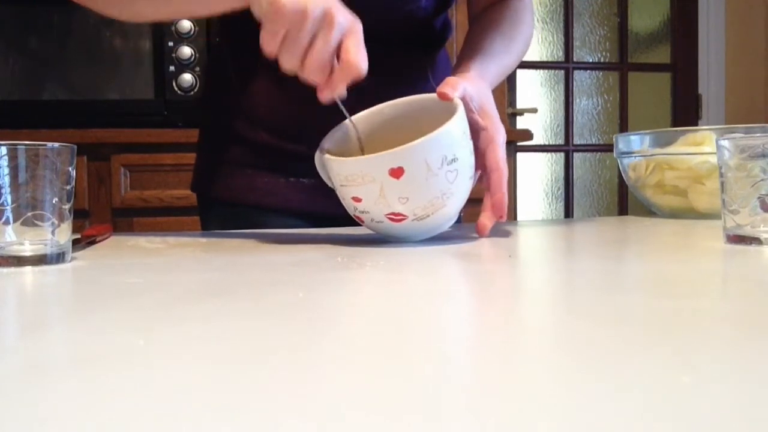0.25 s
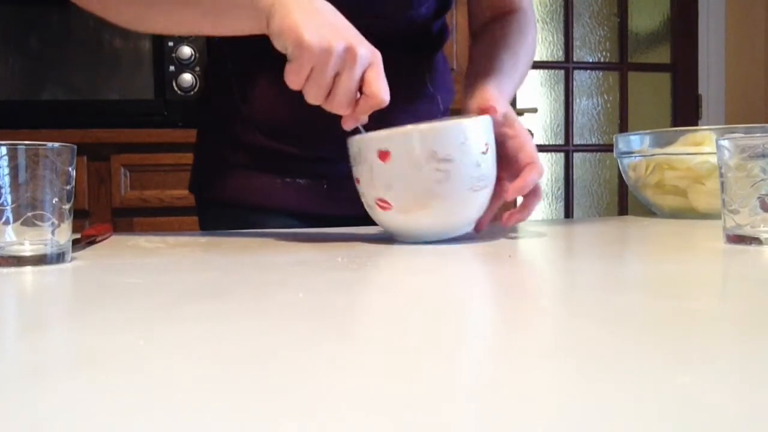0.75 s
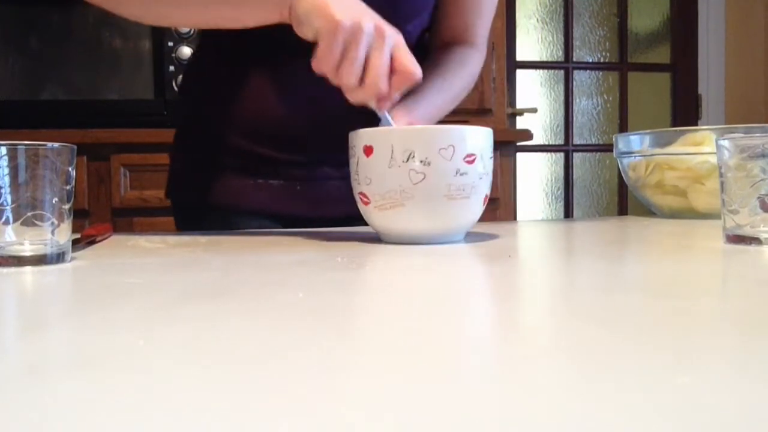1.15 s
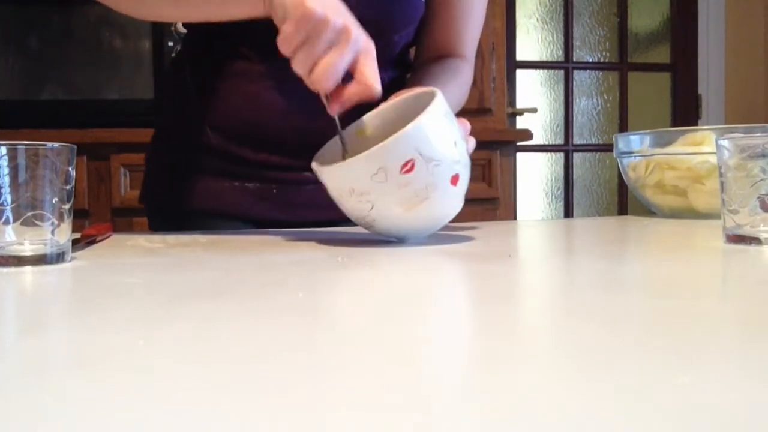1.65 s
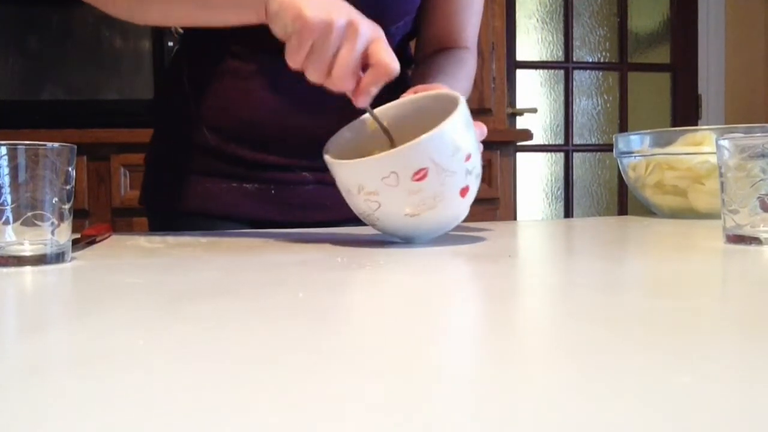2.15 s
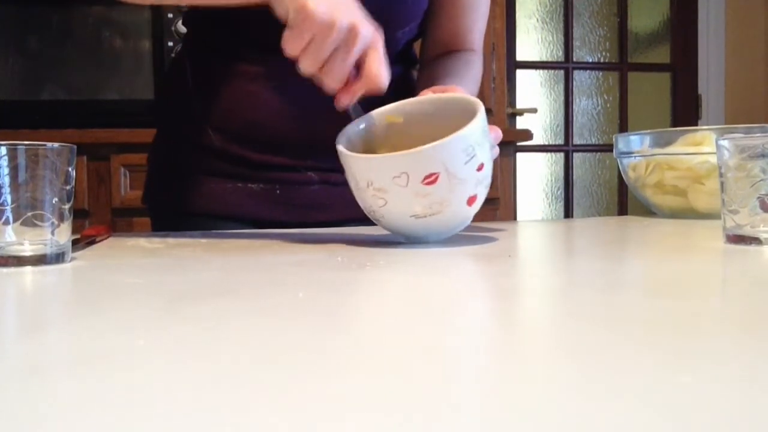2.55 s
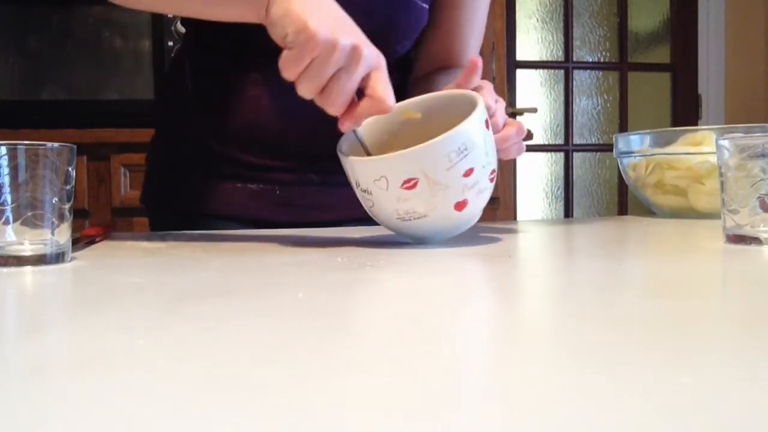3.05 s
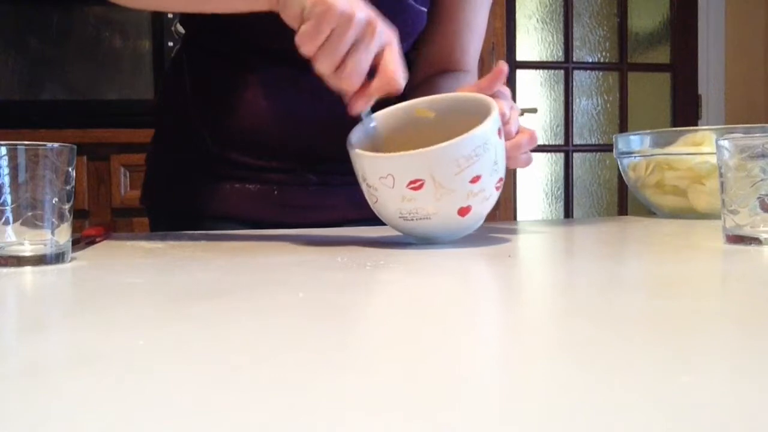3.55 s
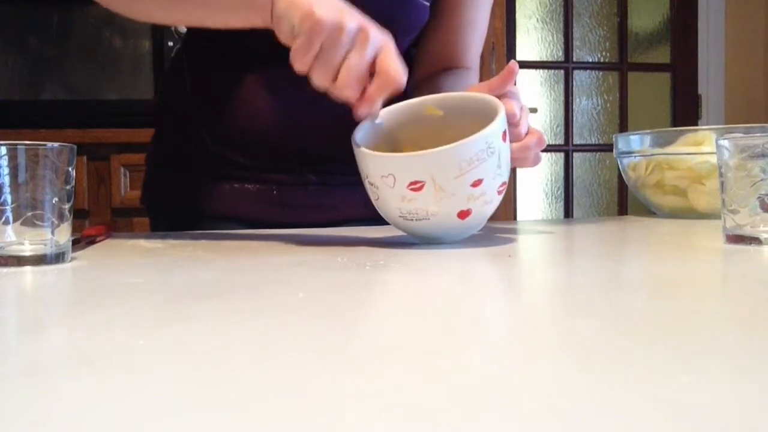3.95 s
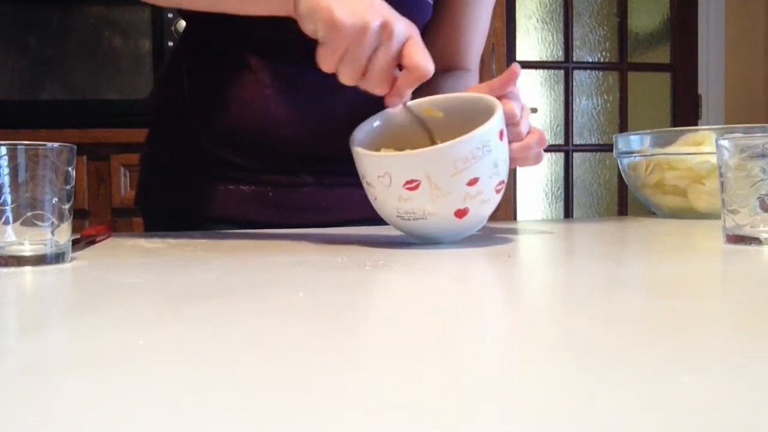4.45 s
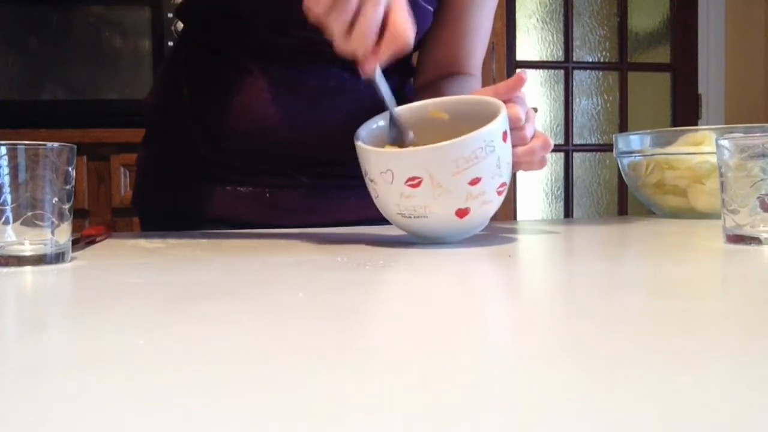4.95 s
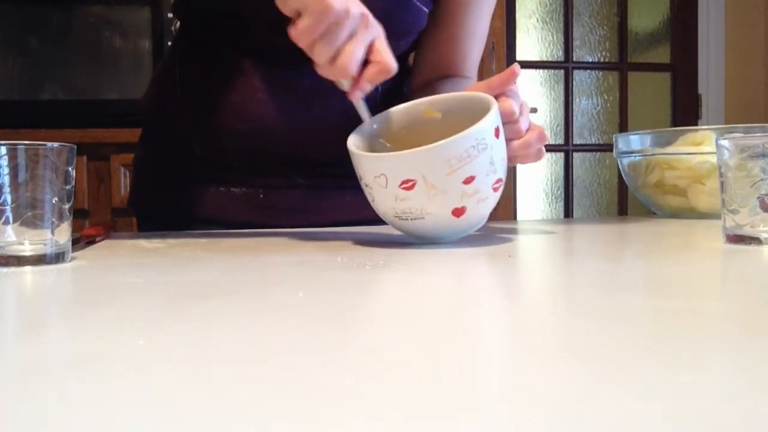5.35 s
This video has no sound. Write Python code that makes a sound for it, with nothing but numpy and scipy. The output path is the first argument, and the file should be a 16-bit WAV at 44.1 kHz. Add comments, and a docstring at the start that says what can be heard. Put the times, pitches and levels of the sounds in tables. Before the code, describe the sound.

A metal fork mashes cooked fruit in a big ceramic bowl. It clinks sharply against the side, then the bowl drops flat on the counter with a knock and a low thud. Soft wet squelches, dull fork ticks and light scrapes follow unevenly, with another clink midway and a bright one near the end, trailed by a short scrape. The sounds are close, in a small hard kitchen with a faint hiss.

```python
"""A kitchen counter in a small hard room: a fork mashes cooked apple in a big handled ceramic bowl.
Impacts excite normal modes: the bowl clinks when bare glaze is struck, the fork ticks dully through
the fruit, and stick-slip friction makes the wall sing. The pulp crackles, squelches through small
resonant cavities and pops as air pockets burst. The bowl is set down once and its foot rubs, driving
the low modes of the counter. The room reverberates over a faint hiss."""
import sys
import numpy as np
from scipy import signal
from scipy.io import wavfile
from scipy.ndimage import uniform_filter1d

SR = 44100
rng = np.random.default_rng(int(sys.argv[2]) if len(sys.argv) > 2 else 0)


def wav_out(sig):
    """Save sig, one row per channel (or a flat mono array), as 16-bit PCM at SR to the path in sys.argv[1]."""
    wavfile.write(sys.argv[1], SR, np.round(np.clip(np.atleast_2d(sig).T, -1, 1) * 32767).astype(np.int16))


N = 247158

# Levels in all tables are relative; t60 is the time a vibration takes to fall by 60 dB.
# Fork on bare glaze. Each row: start in seconds, counter thump in dB, the low, middle, high and
# sparkle registers in dB, ring length factor, extra crack in dB.
GLAZE_CLINKS = [(0.375, -42, -24, -15.5, -21.5, -25.5, 0.52, 0.83),
                (0.3898, -42.5, -34.5, -21.5, -24.5, -36, 0.52, 5.5),
                (3.3984, -50, -20.5, -25.5, -26.5, -34.5, 0.33, 5.1),
                (3.4451, -47, -63, -48, -39.5, -48, 0.12, 9.3),
                (4.0996, -59, -39.5, -38, -41.5, -41.5, 0.26, 2.1),
                (5.1868, -31.5, -22, -21.5, -16.5, -20.5, 0.71, 12.7)]
# The edge of the foot meets the counter. Each row: as for the clinks.
FOOT_STRIKES = [(0.85, -28, -18, -22.5, -20, -26.5, 0.4, 3)]
# The four registers of an impact. Each entry: lower edge in Hz.
REGISTER_EDGES = [1400, 2200, 5200, 9700]
# Tines strike through fruit. Each row: start in seconds, level in dB, tilt in dB per octave, thump in dB.
TINE_TICKS = [(0.099, -47.5, -2, -51.5), (0.624, -49.5, 0, -84), (1.8816, -39.5, 2.5, -50.5),
              (2.2519, -38, 1.5, -48), (2.2972, -44.5, -1.5, -44.5), (2.357, -49, -8, -53),
              (2.9998, -48, 1.5, -77.5), (3.0534, -36.5, -0.5, -35), (3.8069, -44, 1, -41.5),
              (4.21, -44, 4.5, -49.5), (4.5041, -37.5, 0, -44.5), (4.695, -54, 7.5, -44),
              (4.813, -32, 0, -36), (5.4453, -38, -2, -45.5)]
# Spectral shape shared by all ticks. Each row: register centre in Hz, level in dB.
TICK_SHAPE = [(1700, -10.5), (3400, -2), (7000, -0.5), (12000, -0.5)]
# Bowl modes, split in pairs by the handle. Each row: frequency in Hz, nominal t60 in seconds,
# level in dB when struck on the wall, level in dB when struck on the foot.
BOWL_MODES = [(1658, 0.53, -12, -3.5), (1764, 0.35, 5, -15), (1950, 0.055, -8, 0.5),
              (2646, 0.067, 0, -14.5), (2920, 0.053, -34.5, 1.5), (3432, 0.12, -8, -20.5),
              (4370, 0.067, 8.5, -34), (4425, 0.13, 6.5, -12.5), (4562, 0.042, 14.5, -16.5),
              (5700, 0.013, -23.5, -17.5), (5060, 0.0088, -16.5, -0.5), (6680, 0.51, 4, 5),
              (6760, 0.13, 17.5, -7.5), (7500, 0.1, -13.5, -16.5), (7480, 0.12, 22, -10),
              (7940, 0.059, 2, -13.5), (8810, 0.1, 9, 6.5), (7940, 0.039, -23.5, -1), (10940, 0.03, 6.5, 5),
              (10850, 0.066, 12, -25.5), (12660, 0.27, 4, -9), (12400, .07, 5.5, -16),
              (15700, 0.089, -7.5, -12)]
# Fork modes, damped by fruit and fingers. Each row: frequency in Hz, nominal t60 in seconds, level in dB.
FORK_MODES = [(1756, 0.18, -14), (2410, 0.0055, 4), (4554, 0.032, -11.5), (5530, 0.0074, -0.5),
              (6010, 0.025, 3.5), (6420, 0.0061, 17.5), (8540, 0.012, -6), (11500, 0.0087, 12),
              (12120, 0.03, 0.5), (12500, 0.0029, 8.5), (14500, .003, 13)]
# Tines drag up the wall. Each row: peak time, rise and fall in seconds, low and middle ring in dB.
WALL_SCRAPES = [(0.005, .02, 0.038, -59.5, -66), (1.63, 0.04, 0.082, -59, -81),
                (2.05, 0.049, 0.045, -57, -74), (2.38, 0.028, 0.042, -60, -57),
                (2.82, 0.14, 0.067, -68, -76), (4.135, 0.031, 0.064, -75, -48),
                (5.29, 0.024, 0.029, -63, -40.5), (5.424, 0.076, .016, -36.5, -39),
                (5.449, 0.033, 0.013, -48, -40.5)]
# Bowl resonances driven by a scrape. Each row: frequency in Hz, width in Hz before broadening.
SCRAPE_RINGS = [(1785, 92), (4450, 170)]
# The hand bears down. Each row: time of greatest force in seconds, then squashed pulp,
# wet crackle and rocking foot in dB.
HAND_STROKES = [(0.0, -55.5, -46, -54), (0.17, -67, -56.5, -59), (0.571, -60.5, -68.5, -57.5),
                (1.469, -53.5, -60.5, -45.5), (1.96, -57.5, -53.5, -49.5), (2.33, -55.5, -51.5, -52),
                (2.551, -57, -62, -58), (2.828, -70.5, -73.5, -54), (3.11, -87, -77.5, -65),
                (3.489, -61, -62.5, -50), (3.849, -70.5, -61, -57.5), (4.261, -65, -52, -49),
                (4.57, -66, -48.5, -67), (4.83, -60.5, -58, -66.5), (5.54, -67, -53, -71)]
# Pulp squeezed between tines. Each row: peak time, rise and fall in seconds, gurgle in dB,
# frequency of the larger cavity in Hz, spray in dB.
PULP_SQUELCHES = [(1.46, 0.058, 0.047, -48.5, 1540, -55), (1.773, 0.0063, 0.05, -53.5, 950, -42),
                  (2.292, 0.016, 0.013, -44.5, 2450, -49), (2.615, 0.035, .031, -61, 1640, -49),
                  (3.68, 0.18, 0.3, -62, 1140, -64.5), (4.329, 0.039, 0.026, -44.5, 2350, -53.5),
                  (4.326, 0.02, 0.069, -51, 590, -49), (4.708, .012, 0.038, -49, 2050, -46.5),
                  (4.74, 0.034, 0.032, -56.5, 794, -59)]
# The largest air pockets burst. Each row: start in seconds, level in dB, pitch in Hz.
LARGE_POPS = [(0.224, -56.5, 4320), (0.747, -56, 3220), (0.752, -51.5, 2350), (1.496, -55.5, 11700),
              (2.109, -60.5, 6140), (2.199, -54.5, 2020), (2.214, -59.5, 9500), (2.337, -48.5, 8840),
              (2.474, -56, 4650), (2.504, -58, 9400), (4.543, -54, 845), (4.729, -56, 834)]
# The bowl drops flat and rocks. Each row: start in seconds, level in dB.
BOWL_THUDS = [(0.845, -39.5), (0.895, -19.5), (0.899, -18), (0.911, -27), (0.932, -32.5), (1.456, -42.5),
              (1.497, -48.5), (1.528, -50.5)]
# The other hand slides or tips the bowl. Each row: peak time, rise and fall in seconds, level in dB.
BOWL_SLIDES = [(0.851, 0.071, 0.075, -32.5), (1.44, 0.044, 0.032, -55), (1.59, 0.032, 0.051, -53),
               (4.725, 0.018, 0.022, -42)]
# Modes of counter top and cupboard. Each row: frequency in Hz, t60 in seconds,
# level in dB under a light tap, level in dB under the whole bowl.
COUNTER_MODES = [(138.3, 0.37, -5.5, -5), (206, 0.47, 3, -8.5), (272, 0.36, 1, 1.5), (329, 0.37, -18, 3.5),
                 (400, 0.46, -13.5, -10), (464, 0.28, -7.5, -1.5), (654, 0.24, -26, -2),
                 (857.6, 0.37, -10.5, -4), (1045, 0.079, -2.5, 2.5)]
# Reverberation of the room. Each row: frequency in Hz, t60 in seconds.
ROOM_DECAY = [(120, 0.11), (500, 0.49), (2000, 0.31), (5000, 0.39), (9000, 0.32), (15000, 0.29)]
# Spectra of the noisy sounds. Each row: frequency in Hz, gain in dB.
CRACK_SPECTRUM = [(1000, -11.5), (2000, -10.5), (2800, -11.5), (3800, -17.5), (5500, -6), (8000, 2.5),
                  (12000, -14), (15500, -3.5)]  # hard surfaces meeting
PULP_SPECTRUM = [(400, -37), (1000, -3), (1700, -1.5), (2700, 3), (4000, -10.5), (6000, -4.5), (15000, -47)]  # fruit squashing
CRACKLE_SPECTRUM = [(1500, -29.5), (4000, -13), (6200, -0.5), (9000, -12), (12000, -8.5), (15500, -7)]  # wet skin parting
SPRAY_SPECTRUM = [(700, -36.5), (1600, -6), (4000, 0), (7000, -4.5), (11000, -5), (15000, -6.5)]  # juice escaping
TAP_SPECTRUM = [(30, -33), (90, -12.5), (140, -2), (220, 7.5), (400, -2.5), (800, -9), (1400, -19),
                (3000, -38)]  # counter under a light tap
THUD_SPECTRUM = [(30, -40.5), (60, -41), (95, -32.5), (135, -4), (230, 9.5), (330, -3), (480, -2),
                 (750, -5), (1100, -4), (1700, -10), (2700, -15.5), (5000, -28), (12000, -45)]  # counter under the whole bowl
RUB_SPECTRUM = [(40, -42.5), (95, -23.5), (140, 1), (210, -0.5), (400, -6), (900, -10), (1500, -35.5),
                (4000, -37.5)]  # foot grinding
HISS_SPECTRUM = [(30, -35.5), (75, -38), (130, -10.5), (270, 5), (670, -10.5), (1500, -10), (4000, -13),
                 (8000, -14), (14300, -15), (15500, -31)]  # the quiet room

TOP_HZ = 15400
EVENT_T = np.arange(SR // 2) / SR  # time axis of one short event, in seconds


def clinks():
    """Impact on bare glaze excites the normal modes of the bowl's wall."""
    hz, t60, wall_db, _ = np.transpose(BOWL_MODES)
    return impacts(GLAZE_CLINKS, (hz, t60, wall_db), crack_db=37.5, contact_s=0.0012,
                   wet_db=-3, spot_db=5, detune=0.0015)


def ticks(pivot_hz=6000, ring_length=0.9, extra_crack_db=1.5):
    """Fruit cushions the impact of the tines: the thinner the cushion, the brighter the tick."""
    hz, shape_db = np.transpose(TICK_SHAPE)
    octaves = np.log2(hz / pivot_hz)
    rows = [(start, thump_db, *(db + shape_db + tilt * octaves), ring_length, extra_crack_db)
            for start, db, tilt, thump_db in TINE_TICKS]
    return impacts(rows, np.transpose(FORK_MODES), crack_db=23, contact_s=0.0007,
                   wet_db=-2.5, spot_db=2, detune=0.016)


def impacts(rows, modes, crack_db, contact_s, wet_db, spot_db, detune):
    """A blow superposes contact noise, free vibration and a thump; the spot struck weights the modes."""
    out = np.zeros(N)
    hz, t60, mode_db = modes
    longest_t60 = 0.3 * (1700 / hz) ** 0.75  # pulp and the holding hand damp high modes most
    for start, thump_db, *register_db, ring_length, extra_crack_db in rows:
        spot, shift = rng.standard_normal((2, len(hz))) * hz / hz.max()  # high modes vary most
        decay_s = np.minimum(t60 * ring_length, longest_t60)
        ring = ringing(hz * (1 + detune * shift), decay_s, mode_db + spot_db * spot)
        ring *= 1 - np.exp(-EVENT_T / contact_s)
        crack = amp(crack_db + extra_crack_db) * coloured(contact(contact_s), CRACK_SPECTRUM)
        blow = kitchen(ring + crack, wet_db)
        for lo, hi, db in zip(REGISTER_EDGES, REGISTER_EDGES[1:] + [TOP_HZ], register_db):
            add(out, start, at_level(band(blow, lo, hi), db))
        add(out, start, at_level(counter(TAP_SPECTRUM, level_column=2, ring_db=-3.5), thump_db))
    return out


def scrapes(light_touch_db=-55.5, broaden_hz=30):
    """Stick-slip friction drives two resonances of the bowl; a harder scrape widens them."""
    slips = judder() * grains(per_s=990, spread_db=2.5, hiss=0.42)
    out = np.zeros(N)
    for peak, rise, fall, *ring_db in WALL_SCRAPES:
        for (hz, base_width), db in zip(SCRAPE_RINGS, ring_db):
            width = base_width + broaden_hz * amp(db - light_touch_db)
            out += amp(db) * swell(peak, rise, fall) * resonate(slips, hz, width)
    return kitchen(out, wet_db=-3)


def mashing(press_s=0.083, release_s=0.077, resting_db=-80):
    """Pulp yields and its wet skin parts in tiny impulses: shot noise modulated by the hand's force."""
    _, pulp_db, crackle_db, _ = np.transpose(HAND_STROKES)
    resting = amp(resting_db)  # the pulp keeps shifting between strokes
    squash = resting + stroke_force(pulp_db, press_s, release_s)
    parting = resting + stroke_force(crackle_db, press_s, release_s)
    skin = coloured(grains(per_s=520, spread_db=4.2, hiss=0.3), CRACKLE_SPECTRUM)
    pulp = coloured(grains(per_s=470, spread_db=0.5, hiss=0.29), PULP_SPECTRUM)
    return amp(-1.5) * driven(pulp, squash, wet_db=-3.5) + amp(-7.5) * driven(skin, parting, wet_db=-3.5)


def squelches(width_share=0.24, cavity_ratio=1.39):
    """Cavity resonance: air and juice gurgle through two hollows, the smaller higher, and spray out."""
    flow = grains(per_s=1400, spread_db=2, hiss=0.48)
    spray = coloured(grains(per_s=2000, spread_db=3.5, hiss=0.59), SPRAY_SPECTRUM)
    out = np.zeros(N)
    for peak, rise, fall, db, cavity_hz, spray_db in PULP_SQUELCHES:
        gurgle = sum(resonate(flow, hz, hz * width_share) for hz in (cavity_hz, cavity_hz * cavity_ratio))
        out += swell(peak, rise, fall) * (amp(db) * unit_rms(gurgle) + amp(spray_db) * unit_rms(spray))
    return amp(-3.5) * kitchen(judder() * out, wet_db=-3.5)


def pops(decay_cycles=2.5, snap_s=0.0009):
    """A bursting air pocket is a damped oscillator, excited by a wet snap."""
    out = np.zeros(N)
    for start, db, hz in LARGE_POPS + small_pop_rows():
        bubble = np.sin(2 * np.pi * hz * EVENT_T) * np.exp(-EVENT_T * hz / decay_cycles)
        snap = contact(snap_s)
        ring = signal.fftconvolve(snap, bubble / np.linalg.norm(bubble))[:len(EVENT_T)]
        spray = amp(-20) * coloured(snap, SPRAY_SPECTRUM)
        add(out, start, at_level(kitchen(ring + spray, wet_db=-2), db))
    return out


def small_pop_rows(per_stroke=3, scatter_s=0.052, spread_db=1, centre_hz=6000, spread_octaves=0.67):
    """Small pockets burst in a random scatter about each stroke, louder where it is wetter."""
    times, _, crackle_db, _ = np.repeat(HAND_STROKES, per_stroke, axis=0).T
    when, size, pitch = np.clip(rng.standard_normal((len(times), 3)), -2, 2).T
    starts = abs(times + scatter_s * when)
    db = -69.5 + 0.35 * (crackle_db - crackle_db.mean()) + spread_db * size
    return list(zip(starts, db, centre_hz * 2 ** (spread_octaves * pitch)))


def foot_knock():
    """Impact at the foot excites the same bowl modes as at the wall, in other proportions."""
    hz, t60, _, foot_db = np.transpose(BOWL_MODES)
    return impacts(FOOT_STRIKES, (hz, t60, foot_db), crack_db=33.5, contact_s=0.0006,
                   wet_db=-4, spot_db=-4, detune=0.00027)


def thuds():
    """The heavy bowl lands and rocks; the counter top radiates as a sounding board."""
    out = np.zeros(N)
    for start, db in BOWL_THUDS:
        add(out, start, at_level(counter(THUD_SPECTRUM, level_column=3, ring_db=-0.5), db))
    return out


def foot_rub(rock_s=0.076, settle_s=0.085):
    """Friction under the rocking or sliding foot forces the counter's modes; sliding also rasps."""
    rocking = stroke_force(np.transpose(HAND_STROKES)[3], rock_s, settle_s)
    sliding = sum(amp(db) * swell(peak, rise, fall) for peak, rise, fall, db in BOWL_SLIDES)
    grit = grains(per_s=500, spread_db=5.5, hiss=0.84)
    rub = unit_rms(coloured(grit, RUB_SPECTRUM))
    hz, t60, tap_db, _ = np.transpose(COUNTER_MODES)
    boom = unit_rms(signal.fftconvolve(grit, ringing(hz, t60, tap_db))[:N])
    grind = driven(rub + amp(-3) * boom, rocking + sliding, wet_db=1)
    rasp = driven(band(grit, 880, 2500), sliding, wet_db=2.5)
    return amp(-2.5) * grind + amp(-17) * rasp


def counter(spectrum, level_column, ring_db, onset_s=0.0025):
    """The impulse response of the counter top: a dull puff and slowly decaying low modes."""
    modes = np.transpose(COUNTER_MODES)
    puff = kitchen(coloured(signal.unit_impulse(len(EVENT_T)), spectrum), wet_db=1)
    ring = ringing(modes[0], modes[1], modes[level_column]) * (1 - np.exp(-EVENT_T / onset_s))
    return at_level(puff, 0) + at_level(ring, ring_db)


def kitchen(x, wet_db, build_s=0.0041):
    """Reverberation: the direct sound plus a diffuse tail that builds quickly and decays band by band."""
    hz, t, noise = signal.stft(rng.standard_normal(SR // 2), SR, nperseg=256)
    decay = amp(-60 * t / at_frequency(ROOM_DECAY, hz)[:, None])
    tail = signal.istft(noise * decay, SR, nperseg=256)[1]
    tail *= 1 - np.exp(-(np.arange(len(tail)) / SR / build_s) ** 2)
    return x + amp(wet_db) * signal.fftconvolve(x, tail / np.linalg.norm(tail))[:len(x)]


def room_hiss():
    """Stationary filtered noise forms the background of the room."""
    return unit_rms(coloured(rng.standard_normal(N), HISS_SPECTRUM))


def ringing(hz, t60, db):
    """Free vibration is a sum of exponentially damped sines, one for each mode."""
    t = EVENT_T[:, None]
    envelopes = amp(db) * np.exp(-np.log(1000) * t / t60)
    return (envelopes * np.sin(2 * np.pi * (hz * t + rng.random(len(hz))))).sum(1)


def contact(peak_s):
    """Brief contact gives a broadband burst of chatter, here of unit energy."""
    age = EVENT_T / peak_s
    chatter = rng.standard_normal(len(age)) * age * np.exp(-age)
    return chatter / np.linalg.norm(chatter)


def grains(per_s, spread_db, hiss):
    """Shot noise: tiny slips of uneven size at random times, over a smooth hiss."""
    sizes = amp(spread_db * np.minimum(rng.exponential(1, N), 4)) * rng.choice([-1, 1], N)
    slips = sizes * (rng.random(N) < per_s / SR)
    return unit_rms(slips) + hiss * rng.standard_normal(N)


def judder(depth_db=2.5, smooth_s=0.009):
    """Random amplitude modulation: pulp and tines give way in fits and starts."""
    wander = uniform_filter1d(rng.standard_normal(N), round(smooth_s * SR))
    wander = uniform_filter1d(wander, round(smooth_s * SR / 2))
    return unit_rms(amp(depth_db * np.clip(unit_rms(wander), -2, 2)))


def driven(texture, force, wet_db):
    """Amplitude follows force; direct and reverberant sound share the power."""
    return kitchen(force * unit_rms(texture), wet_db) / np.hypot(1, amp(wet_db))


def stroke_force(levels_db, rise, fall):
    """Forces superpose, one swell for each stroke of the hand."""
    return sum(amp(db) * swell(peak, rise, fall) for (peak, *_), db in zip(HAND_STROKES, levels_db))


def swell(peak, rise, fall):
    """Force builds as a Gaussian up to the peak time, then relaxes exponentially."""
    t = np.arange(N) / SR - peak
    return np.exp(-np.minimum(np.where(t < 0, (t / rise) ** 2, t / fall), 30))


def resonate(x, hz, width):
    """Two equal resonators in cascade give a steep-sided peak; the output has unit RMS."""
    b, a = signal.iirpeak(hz, hz / width, fs=SR)
    return unit_rms(signal.lfilter(b, a, signal.lfilter(b, a, x)))


def band(x, lo, hi):
    """A band-pass filter keeps one register."""
    return signal.sosfilt(signal.butter(3, [lo, hi], btype="band", fs=SR, output="sos"), x)


def coloured(x, spectrum, size=4096):
    """A causal, minimum-phase filter imposes the given spectrum."""
    log_gain = np.log(amp(at_frequency(spectrum, abs(np.fft.fftfreq(size, 1 / SR)))))
    taps = np.fft.ifft(np.exp(np.conj(signal.hilbert(log_gain)))).real[:size // 2]
    return signal.fftconvolve(x, taps)[:len(x)]


def at_frequency(table, hz):
    """Interpolation on a logarithmic frequency axis."""
    table_hz, values = np.transpose(table)
    return np.interp(np.log(hz + 1), np.log(table_hz + 1), values)


def add(mix, start, sound):
    """Superposes a sound on the mix at a start time in seconds."""
    part = mix[max(round(start * SR), 0):][:len(sound)]
    part += sound[:len(part)]


def at_level(x, db):
    """Scales a blow so that its first 30 ms have the given RMS level."""
    return amp(db) * x / rms(x[:SR * 3 // 100])


def unit_rms(x):
    """Scales a signal to unit mean power."""
    return x / rms(x)


def rms(x):
    """Root mean square."""
    return np.sqrt(np.mean(x ** 2) + 1e-24)


def amp(db):
    """Decibels to amplitude ratio."""
    return 10 ** (np.asarray(db) / 20)


def scene():
    """Bowl, fork and fruit superpose on the faint hiss of the room, in one channel."""
    strikes = amp(-7.5) * clinks() + amp(-2) * foot_knock() + amp(-5.5) * ticks()
    background = amp(-64) * room_hiss()
    bowl = thuds() + scrapes() + foot_rub()
    fruit = pops() + squelches() + mashing()
    return (strikes + bowl + fruit + background)[None]


def record(dry):
    """A linear-phase low-pass filter removes the highest treble."""
    lowpass = signal.firwin(401, TOP_HZ, window=("kaiser", 8), fs=SR)
    return signal.oaconvolve(dry, lowpass[None], "same")


dry = scene()
out = record(dry)
wav_out(out)
```